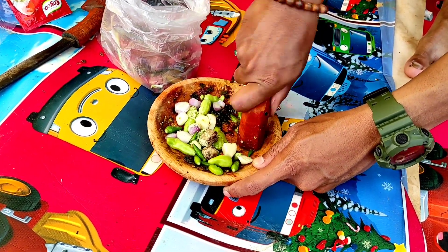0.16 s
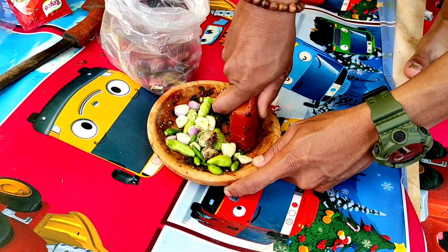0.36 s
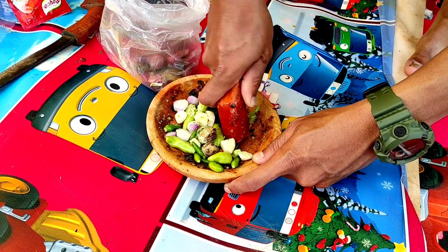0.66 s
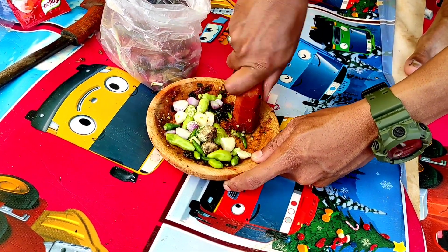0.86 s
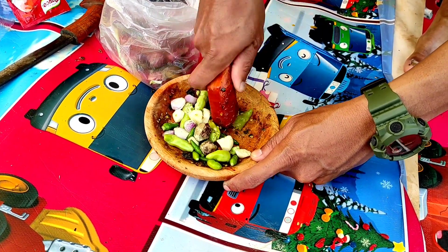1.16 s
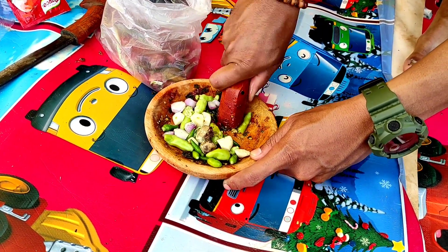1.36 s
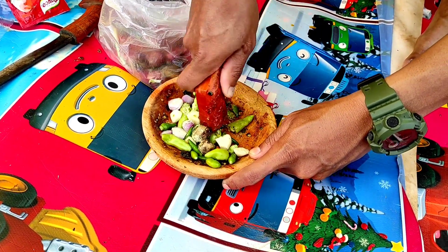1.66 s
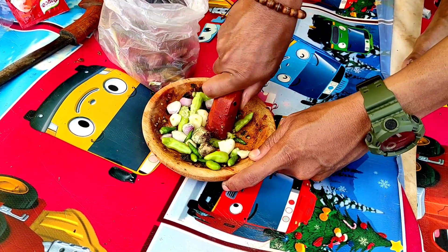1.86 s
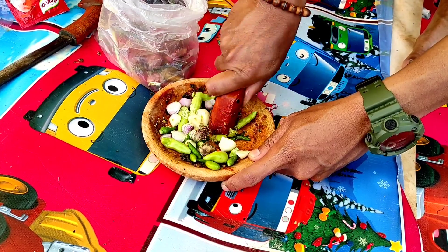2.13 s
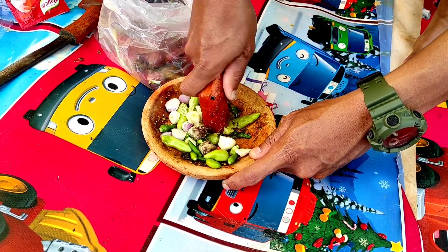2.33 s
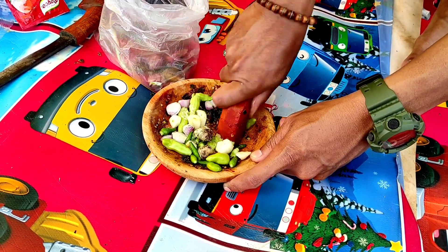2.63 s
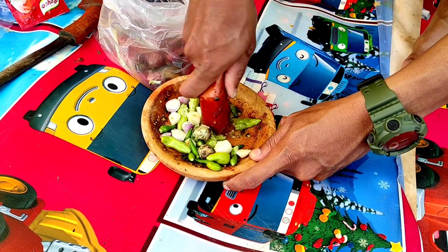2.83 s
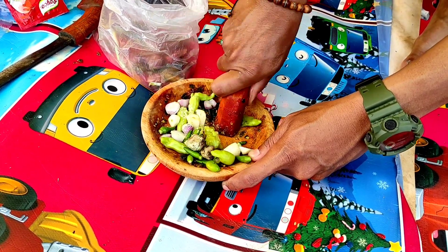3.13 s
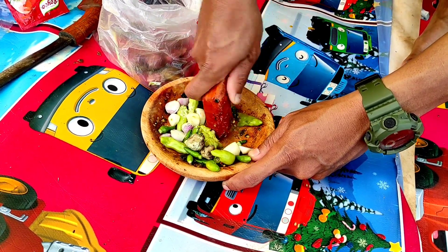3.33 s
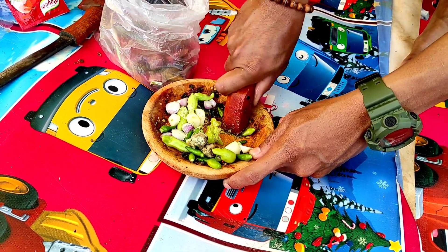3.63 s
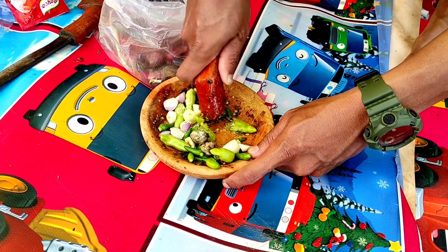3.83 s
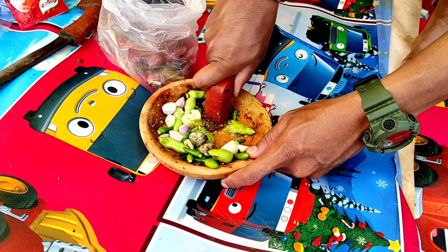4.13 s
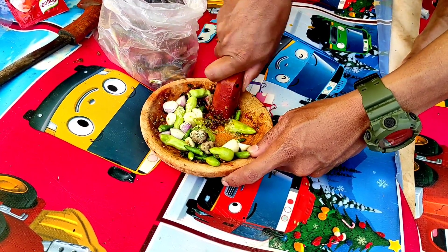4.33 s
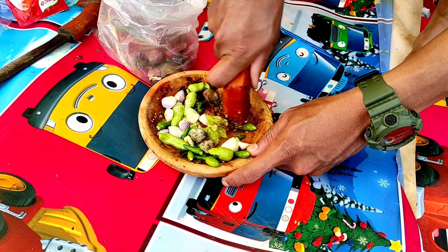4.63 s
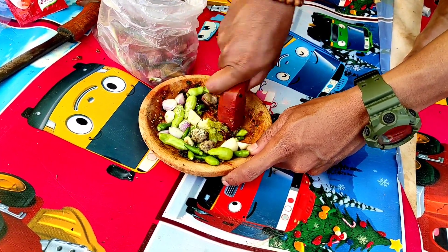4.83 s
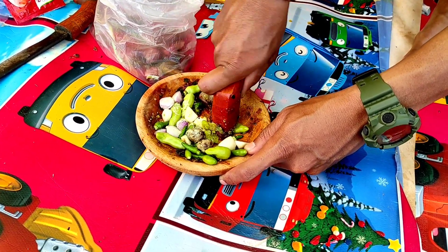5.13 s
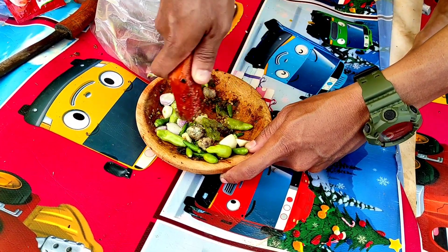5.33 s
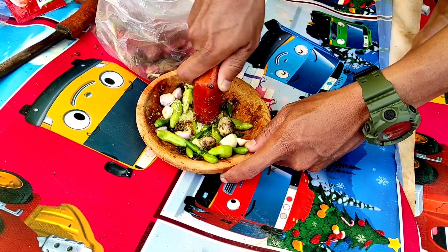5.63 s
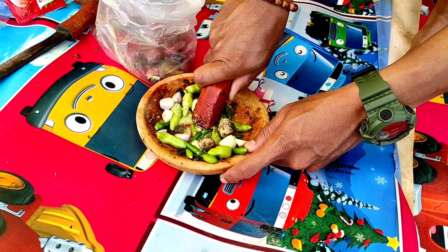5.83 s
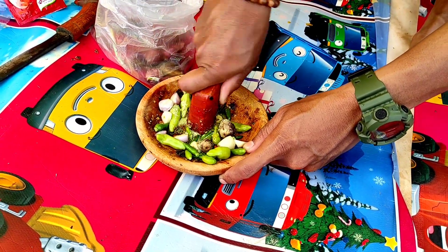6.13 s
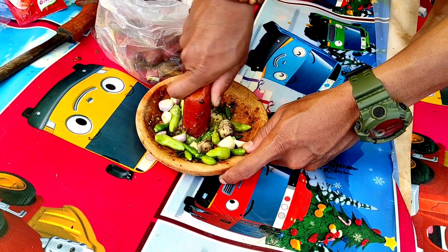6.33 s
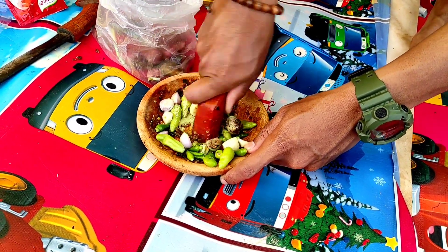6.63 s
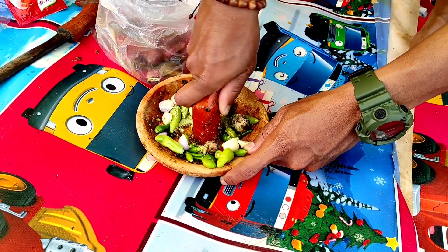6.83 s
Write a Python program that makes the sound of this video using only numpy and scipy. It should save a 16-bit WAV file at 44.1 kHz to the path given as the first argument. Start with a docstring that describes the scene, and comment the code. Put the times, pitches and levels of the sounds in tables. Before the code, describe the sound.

Close up outdoors, a wooden pestle presses and drags through shallots, garlic and chilies in a small hand-held wooden mortar. Uneven wet crackling strokes come several times a second, with sharp little skin snaps. At about four seconds heavier blows begin, loud hollow knocks with cracking pulp and short wooden ringing, until just before six seconds; then brisk wet crunching returns. Faint insects and low hum lie behind. The close stereo microphone sounds bright and dry.

```python
"""Outdoors, insects shrill faintly over rumble, hiss and a far low hum: all are steady bands of noise.
From the start a wooden pestle works shallots, garlic and chilies in a hand-held wooden mortar on a mat:
wet strokes are clouds of tiny clicks, skins snap as short bursts, and soft knocks and a light tap join in.
From about 4 s harder blows knock through to the bowl, adding thuds, cracks and decaying ringing modes.
Two small microphone ports, resonant around 7 to 9 kHz, brighten everything."""
import sys
import numpy as np
from scipy import signal
from scipy.fft import rfft, irfft
from scipy.io import wavfile

SR = 44100
rng = np.random.default_rng(int(sys.argv[2]) if len(sys.argv) > 2 else 0)


def wav_record(signal):
    """Record a signal, one row per channel, as 16-bit PCM in the file named by sys.argv[1]."""
    frames = np.transpose(np.atleast_2d(signal))
    bounded = np.clip(frames, -1, 1)
    # unit amplitude maps onto the largest positive 16-bit level
    quanta = np.round(bounded * 32767).astype(np.int16)
    wavfile.write(sys.argv[1], SR, quanta)


N = 307818

# In all tables: levels are relative and trimmed by their layer, pan_db is left minus right,
# and t60_s is the time to fall by 60 dB.
# Spectra of the air on each side: pitch_hz, density_db (per Hz)
AIR_LEFT_SPECTRUM = [(20, 21.5), (60, 13), (110, 21), (165, 25), (230, 19), (400, 13.5), (1000, 5.5),
                     (2000, -2.5), (4000, -3.5), (5700, 6), (6500, 3.5), (8500, 3), (10500, -10),
                     (15000, 2.5)]
AIR_RIGHT_SPECTRUM = [(20, 10), (60, 17), (110, 13.5), (165, 21.5), (230, 14), (400, 10), (1000, 0.5),
                      (2000, -0.5), (4000, -1.5), (5700, 5.5), (6500, -2), (8500, 3), (10500, -4),
                      (15000, -1.5)]
# The pestle leans into the pulp and eases off: start_s, press_s, ease_s, crackle_db, rub_db
STROKES = [(0.01, 0.036, 0.035, -63, -63.5), (0.26, 0.092, 0.048, -46.5, -57),
           (0.471, 0.13, 0.034, -53, -59), (0.699, 0.033, 0.047, -55.5, -63.5),
           (0.897, 0.07, 0.093, -46, -54.5), (1.061, 0.039, 0.036, -45.5, -54.5),
           (1.162, 0.045, 0.025, -58.5, -63), (1.347, 0.015, 0.12, -45.5, -55),
           (1.571, 0.012, 0.12, -52, -61.5), (1.79, 0.047, 0.064, -42.5, -51),
           (1.912, 0.068, 0.088, -47.5, -57), (2.144, 0.012, 0.075, -41, -55),
           (2.253, 0.032, 0.048, -46, -58.5), (2.36, 0.075, 0.042, -58, -63.5),
           (2.581, 0.068, 0.046, -48, -56), (2.678, 0.029, 0.052, -41, -53), (2.82, 0.04, 0.03, -57, -60.5),
           (3.059, 0.021, 0.023, -46, -58.5), (3.115, 0.011, 0.14, -46, -55.5),
           (3.288, 0.022, 0.054, -52, -58), (3.61, 0.083, 0.13, -50, -57.5),
           (4.036, 0.1, 0.12, -41.5, -53.5), (4.369, 0.028, 0.093, -46, -56.5),
           (4.462, 0.029, 0.21, -56.5, -63), (4.755, 0.013, 0.12, -49, -55.5),
           (4.901, 0.032, 0.022, -42, -62), (5.045, 0.069, 0.012, -46.5, -68),
           (5.50, 0.048, 0.06, -46.5, -60.5), (5.68, 0.29, 0.096, -54, -62),
           (5.997, 0.035, 0.054, -37.5, -51), (6.119, 0.094, 0.076, -48, -65),
           (6.259, 0.012, .03, -42.5, -54.5), (6.304, .02, 0.065, -44, -54.5),
           (6.417, 0.61, 0.068, -48.5, -65.5), (6.635, .015, 0.043, -51, -61.5),
           (6.707, 0.039, 0.027, -38, -49.5), (6.815, 0.013, 0.046, -45, -52.5),
           (6.91, 0.088, 0.035, -49, -55)]
# Spectra of bursting wet cells and of rubbing heard through the wood: pitch_hz, density_db (per Hz)
CRACKLE_SPECTRUM = [(1500, -16.5), (3000, -4.5), (4500, -5.5), (6000, -0.5), (7500, 1), (9000, -5.5),
                    (12000, -2.5), (15000, -13.5)]
RUBBING_SPECTRUM = [(100, -12.5), (200, -2.5), (400, -5.5), (635, 6.5), (800, 4), (1050, 6.5), (1400, 0.5),
                    (1750, -4.5), (2150, -0.5), (2400, 1), (2700, -3.5), (3320, 1), (4200, -2), (5500, -14),
                    (12000, -53)]
# Single skins and seeds snapping: start_s, level_db, wood_share_db, pan_db
SNAPS = [(0.222, -10, -24.5, 1), (0.226, -4.5, -27, 5), (0.2286, -9.5, -32, -1), (0.2393, -13.5, -59, -1),
         (0.588, -18, -51, -5), (1.0983, -20, -27, 6), (0.3197, -33, -25, 2), (0.3456, -25, -25, -10),
         (0.562, -31, -32, -12), (0.9491, -28, -15, 13), (1.033, -26.5, -22, 9), (1.352, -30.5, -6.5, -10),
         (1.6237, -37, -18, 2), (1.802, -25, -36, -4), (1.844, -33, -6, 0), (2.0103, -30, -38, -11),
         (2.2787, -28, -37, -10), (2.6906, -24, -22, -5), (3.0898, -30, -20, 5), (3.3005, -38, -25, -6),
         (1.81, -21.5, -37, -5), (1.8237, -35, -14, 3), (1.8377, -21, -18, -3), (1.956, -28, -33, 4),
         (2.0362, -21, -19.5, -3), (2.156, -30.5, -17, -6), (2.2162, -26, -43, 6), (2.2863, -26.5, -39, -9),
         (2.7028, -21, -25, -9), (2.7254, -29, -27, -11), (3.0784, -30.5, -9, 5), (3.316, -29.5, -23, -10),
         (3.7279, -19.5, -27, 4), (3.905, -27, -21, 3), (4.772, -27, -12.5, 8), (4.804, -23.5, -10.5, -3.5),
         (4.846, -29, -12, -2), (4.94, -24, -16.5, -9), (5.0165, -18, -13, 2.5), (5.161, -28.5, -12, -7),
         (5.979, -25.5, -33, -5), (6.0324, -16, -46, -1.5), (6.269, -29, -11, -5), (6.2933, -22, -39, -5),
         (6.6958, -21.5, -13, 1), (6.7528, -24.5, -22, 13), (6.792, -28, -22, 2), (6.7212, -19.5, -25, -9),
         (6.7631, -20.5, -10, 6), (6.835, -15.5, -51, -1.5)]
# Pestle meeting the bowl: start_s, level_db, thud_hz, contact_s, bareness (0 on pulp to 1 on wood),
# ring_cutoff_hz, mat_push_db
BLOWS = [(0.2229, -41.5, 420, 0.0012, .2, 700, 12), (1.351, -43.5, 480, .006, .1, 600, 1),
         (2.454, -46, 540, 0.017, .3, 700, -15), (2.897, -44.5, 262, 0.01, .2, 496, 5),
         (2.965, -42, 420, 0.0056, .15, 500, 4), (3.9924, -12, 544, 0.012, .03, 890, 5.5),
         (4.0125, -18.5, 539, 0.01, .2, 500, 9.5), (4.211, -8.5, 539, 0.012, .42, 3600, 4),
         (4.354, -19, 531, 0.011, .15, 1270, 8.5), (4.623, -50.5, 548, 0.027, .6, 1300, -15),
         (5.016, -41.5, 457, 0.0052, .5, 800, 16.5), (5.09, -10, 560.4, 0.013, 1.0, 1300, 1),
         (5.3021, -10.5, 550, 0.0087, .88, 1600, 1.5), (5.473, -9.5, 533, 0.011, .85, 2000, 0),
         (5.634, -9.5, 534, 0.012, .9, 2400, -2.5), (6.925, -54.5, 296, 0.025, .1, 500, 16)]
# Modes of pestle and bowl while pressed together: pitch_hz, level_db, t60_s
CLACK_MODES = [(412, -9, 0.074), (1093, -22, 0.061), (1426, -10.5, 0.086), (1580, -17.5, 0.024),
               (1810, -21, 0.02), (2487, -16.5, 0.027), (2740, -8.5, 0.053), (2890, -27.5, 0.04),
               (3930, -23.5, 0.066)]
# Modes of the freely ringing bowl: pitch_hz, level_db, t60_s, pan_db
BOWL_MODES = [(565, -17, 0.19, -0.5), (1477, -18.5, 0.15, 9), (1808, -18, 0.049, 3), (2080, -23, 0.066, -4),
              (2400, -34.5, 0.06, 2.5), (2640, -26, 0.054, 3), (2085, -23, 0.11, 1.5),
              (2959, -20, 0.11, -5), (3900, -31.5, 0.1, 1), (4500, -33.5, 0.077, -12),
              (4900, -38.5, 0.06, 8.5)]
# Spectrum of the many heavily damped wood modes, heard as one dense rap: pitch_hz, density_db (per Hz)
RAP_SPECTRUM = [(50, -39.5), (150, -12.5), (250, -5.5), (450, 8.5), (700, -9), (1050, -2), (1280, -2),
                (1550, 6.5), (1900, -8), (2250, -10.5), (2620, 1), (3000, -7), (3500, -25.5), (4080, -10),
                (4600, -18.5), (9000, -30.5)]
# Spectrum of pulp cracking under a blow: pitch_hz, density_db (per Hz)
CRACK_SPECTRUM = [(300, 4.5), (1000, 5), (2500, -5), (4000, -4.5), (6000, -4.5), (8000, -6.5),
                  (10000, -7.5), (15000, -23)]
# Faint echoes of the blows from things nearby: delay_s, level_db
ECHOES = [(0.046, -38.5), (.076, -39), (.108, -44.5)]
# Modes rung by a light tap on the bare wall: pitch_hz, level_db, t60_s
TAP_MODES = [(1460, -4, 0.16), (1600, 1.5, 0.037), (1790, -4, 0.062), (2110, -11, 0.15)]
# Response of each microphone port: pitch_hz, gain_db
PORT_LEFT = [(4400, 2), (5400, -4), (6800, -6.5), (7600, 6.5), (8600, 18), (9150, 18.5), (9700, -1),
             (11000, -4.5), (12000, -15), (15000, -9)]
PORT_RIGHT = [(4400, 0.5), (5600, 3), (6500, 6.5), (7300, 15.5), (8000, 15.5), (8800, 9.5), (9500, 2),
              (11000, -30), (12000, -8.5), (15000, -9)]

# Pulp under the pestle muffles the wood; trims as (on_pulp_db, on_bare_wood_db)
CLACK_DB, RING_DB, RIM_DB = (-38.5, -2), (-7.5, 0), (-32.5, -21)
CRACK_DB, RAP_DB = (-24, -19.5), (-21, -4)
CRACK_FOLLOWS, RAP_FOLLOWS = 0.63, 0.78  # dB of crack or rap per dB of blow


def from_db(db):
    """Decibels to an amplitude factor."""
    return 10 ** (np.asarray(db) / 20)


def rms_one(x):
    """Scale to an RMS of 1."""
    return x / np.sqrt(np.mean(x ** 2) + 1e-20)


def panned(db):
    """Left and right gains whose difference is db."""
    return from_db(np.array([[db], [-db]]) / 2)


def add(out, s, sound):
    """Mix a sound in at s seconds."""
    start = int(s * SR)
    out[:, start:start + sound.shape[1]] += sound[:, :max(N - start, 0)]


def butter(x, hz, kind, order=2):
    """Butterworth filter."""
    return signal.sosfilt(signal.butter(order, hz, kind, fs=SR, output="sos"), x)


def band_edges(hz, width_hz):
    """Lower and upper edge of a band."""
    return hz + width_hz * np.array([-0.5, 0.5])


def colour(x, points, size=4096):
    """Causal (minimum-phase) filter that follows a spectrum."""
    hz, db = np.transpose(points)
    grid = np.linspace(1, SR / 2, size // 2 + 1)
    gain = from_db(np.interp(np.log(grid), np.log(hz), db))
    cepstrum = irfft(np.log(gain))
    # folding the cepstrum forward in time makes the filter causal
    cepstrum[1:size // 2] *= 2
    cepstrum[size // 2 + 1:] = 0
    impulse = irfft(np.exp(rfft(cepstrum)))
    return signal.oaconvolve(x, impulse[None])[:, :x.shape[1]]


def stereo_noise(size, alike):
    """White noise whose sides share a part: alike is 0 for separate, 1 for identical."""
    shared, left, right = rng.standard_normal((3, size))
    return np.sqrt(alike) * shared + np.sqrt(1 - alike) * np.array([left, right])


def swell(t, t60, rise_s):
    """An envelope that builds up and then dies away."""
    return (1 - np.exp(-t / rise_s)) * 1000 ** (-t / t60)


def tone(t, hz, lag_rad=1.465):
    """Opposite walls of the bowl move against each other, so the left port hears part of a cycle late."""
    return np.sin(2 * np.pi * hz * t - np.array([[lag_rad], [0]]))


def mode(t, hz, t60, rise_s):
    """A resonance that swells during the contact and then rings out."""
    return swell(t, t60, rise_s) * tone(t, hz)


def hollow(x, spread_s=0.004, echo_db=1.5, count=10):
    """Bowl wall, pestle and fingers return a few very short echoes, drawn anew for each sound."""
    paths = np.zeros((2, int(spread_s * SR) + 2))
    paths[:, 0] = 1  # direct sound
    for side in paths:
        lags = 1 + (rng.random(count) * spread_s * SR).astype(int)
        side[lags] = from_db(echo_db) * rng.standard_normal(count) / np.sqrt(count)
    heard = signal.oaconvolve(x, paths, axes=1)[:, :x.shape[1]]
    return heard / np.sqrt(1 + from_db(echo_db) ** 2)


def outdoors(air_db=-64.0):
    """Far rumble, alike on both sides, under a thin hiss and a steady band of insect song."""
    rumble = butter(stereo_noise(N, alike=1.0), hz=700, kind="low", order=1)
    hiss = butter(stereo_noise(N, alike=0.034), hz=700, kind="high", order=1)
    air = rumble + hiss
    air = np.vstack([colour(air[:1], AIR_LEFT_SPECTRUM), colour(air[1:], AIR_RIGHT_SPECTRUM)])
    song = butter(stereo_noise(N, alike=0.1), band_edges(hz=8700, width_hz=600), "band")
    return from_db(air_db) * air + from_db([[-73.5], [-80.5]]) * rms_one(song)  # insects louder at left


def far_hum(hum_db=-71.0):
    """A faint, unsteady low hum from far away: a narrow band of noise."""
    hum = butter(stereo_noise(N, alike=0.91), band_edges(hz=170, width_hz=30), "band")
    return from_db(hum_db) * panned(db=2.0) * rms_one(hum)


def pressure(t, press_s, ease_s, bite_s=0.0024, lift_s=0.051):
    """A stroke bites, builds to its peak, eases and lifts off; returns a share of peak pressure."""
    return np.interp(t, np.cumsum([0, bite_s, press_s, ease_s, lift_s]), [0, 0.66, 1, 0.32, 0])


def drift(rate):
    """Smooth random wander with a spread near 1, taking a new value rate times a second."""
    knots = rng.standard_normal(N // 20)
    return np.interp(np.arange(N) / SR * rate, np.arange(len(knots)), knots)


def grains(size, per_s, spread_db):
    """Bursting cells: random clicks of uneven size, heard differently on each side."""
    born = rng.random(size) < per_s / SR
    sizes = from_db(spread_db * np.minimum(rng.exponential(1, size), 4))
    return rms_one(born * sizes * stereo_noise(size, alike=0.13))


def grinding(crackle_db=-8.0, clump_db=1.5, catch_db=2.0):
    """The pestle drags over wet pulp; the same grains crackle in air and sound through the wood."""
    out = np.zeros((2, N))
    unevenness_db = clump_db * drift(rate=160) + catch_db * drift(rate=41)
    cells = rms_one(grains(N, per_s=1500, spread_db=0.5) * from_db(unevenness_db))
    bright = rms_one(colour(cells, CRACKLE_SPECTRUM))
    woody = rms_one(colour(cells, RUBBING_SPECTRUM))
    for s, press_s, ease_s, wet_db, wood_db in STROKES:
        start = int(s * SR)
        span = np.arange(start, min(start + SR // 2, N))  # a stroke sounds for half a second at most
        force = pressure(span / SR - s, press_s, ease_s)
        add(out, s, from_db(crackle_db + wet_db) * hollow(bright[:, span] * force))
        add(out, s, from_db(wood_db) * hollow(woody[:, span] * force))
    return out


def slips(count=7, low_hz=600, high_hz=4200, t60=0.035):
    """The pestle sticks and slips: short, coarse scrapes, each with its own pitch, follow the pressure."""
    out, t = np.zeros((2, N)), np.arange(SR // 16) / SR
    for s, press_s, ease_s, _, wood_db in STROKES:
        for when, pitch, size in rng.random((count, 3)):
            hz = low_hz * (high_hz / low_hz) ** pitch
            at = when * (press_s + ease_s)
            coarse = grains(len(t), per_s=1200, spread_db=-1.5)
            scrape = rms_one(butter(coarse, band_edges(hz, width_hz=0.45 * hz), "band", order=1))
            level_db = wood_db - 13 + 9 * size  # 13 to 4 dB under the stroke's rubbing
            strength = from_db(level_db) * pressure(at, press_s, ease_s)
            add(out, s + at, strength * scrape * swell(t, t60, rise_s=0.0007))
    return out


def small_snaps():
    """Each stroke also breaks a small skin near its peak, as strong as it is wet; rows as in SNAPS."""
    rows = []
    for s, press_s, ease_s, wet_db, _ in STROKES:
        when = rng.uniform(-0.55, 1)  # negative: before the peak
        reach_s = (press_s if when < 0 else ease_s) / 2
        rows.append((s + press_s + when * reach_s, wet_db + 6, -23, -20.5))
    return rows


def snaps(snap_db=-5.0, wood_db=7.5, click_db=3.0, tear_db=-16.5, tear_per_db=0.2):
    """A skin breaks with one sharp click amid a quick burst, then tears on more softly."""
    bright, woody, t = np.zeros((2, N)), np.zeros((2, N)), np.arange(SR // 8) / SR
    click = from_db(click_db) * (np.arange(len(t)) == int(0.0016 * SR))  # one sample, 1.6 ms in
    for s, db, wood_share_db, pan_db in list(SNAPS) + small_snaps():
        tear = from_db(tear_db + tear_per_db * db) * swell(t, t60=0.1, rise_s=0.0019)  # more if harder
        fall = swell(t, t60=0.0067, rise_s=0.00051) + tear
        cells = hollow(fall * grains(len(t), per_s=24000, spread_db=0.0))
        burst = from_db(db) * (click + cells) * panned(pan_db)
        add(bright, s, from_db(snap_db) * burst)
        add(woody, s, from_db(wood_db + wood_share_db) * burst)
    return colour(bright, CRACKLE_SPECTRUM) + colour(woody, RUBBING_SPECTRUM)


def thud(t, hz, contact_s, rise_s, release_s):
    """The bowl rocks at one hollow pitch until the contact ends, then is released."""
    pressed = np.clip(t / rise_s, 0, 1) * np.clip((contact_s - t) / release_s + 1, 0, 1)
    return pressed * tone(t, hz)


def overtone(t, hz, bare, db=-14.5):
    """The one-sided contact of hard wood briefly adds the octave of the thud."""
    return from_db(db) * np.sqrt(bare) * mode(t, 2 * hz, t60=0.053, rise_s=0.002)


def clack(t, scatter_db=1.2, detune=0.0047):
    """Wood on wood: short, strongly damped modes that shift a little with the spot struck."""
    out = 0
    for k, (hz, db, t60) in enumerate(CLACK_MODES):
        lag_rad = np.interp(hz, [1500, 2500], [1.5, 2.7])  # high modes reach the left later in their cycle
        wave = tone(t, hz * (1 + detune * rng.standard_normal()), lag_rad)
        strength = from_db(db + scatter_db * rng.standard_normal())
        out = out + (-1) ** k * strength * swell(t, t60, rise_s=0.0006) * wave
    return out


def rap(t, t60=0.06):
    """A dense, woody burst of noise as the pestle's rough end meets the bowl."""
    return colour(stereo_noise(len(t), alike=0.21) * swell(t, t60, rise_s=0.0018), RAP_SPECTRUM)


def bowl_ring(t, cut_hz, scatter_db=-5.0, rock_db=-12.5):
    """The released bowl rocks on and rings; a softer blow spares the modes above its cutoff."""
    out = from_db(rock_db) * thud(t, hz=574, contact_s=0.026, rise_s=0.016, release_s=0.014)
    for hz, db, t60, pan_db in BOWL_MODES:
        softening = np.sqrt(1 + (hz / cut_hz) ** 4)
        strength = from_db(db + scatter_db * rng.standard_normal()) / softening
        out = out + strength * panned(pan_db) * mode(t, hz, t60, rise_s=0.007)
    return out


def mat_thump(t, push_db=21.0, bounce_db=-11.5, sway_db=5.5):
    """The blow pushes the bowl into the mat, where it bounces at a low pitch."""
    push = butter(1.0 * (t == 0), hz=420, kind="low", order=5)
    push = from_db(push_db) * butter(push, hz=145, kind="high", order=4)
    bounce = from_db(bounce_db) * mode(t, hz=177.0, t60=0.067, rise_s=0.035)
    sway = from_db(sway_db) * mode(t, hz=384.0, t60=0.022, rise_s=0.014)
    return butter(push - bounce + sway, hz=103.3, kind="high") * panned(db=3.5)


def pulp_crack(t, t60=0.098):
    """Pulp gives way under a blow in a wet burst of noise."""
    burst = stereo_noise(len(t), alike=0.33) * swell(t, t60, rise_s=0.0032)
    return colour(hollow(burst), CRACK_SPECTRUM)


def knocks(thud_pan_db=-1.5, ground_db=-28.5, crack_lead_s=0.0024):
    """Each blow thuds, clacks, raps, rings, thumps and cracks; barer wood clacks and rings more."""
    out, t = np.zeros((2, N)), np.arange(SR // 2) / SR
    mat = mat_thump(t)
    ground = from_db(ground_db) * mode(t, hz=80, t60=0.14, rise_s=0.006)
    rim = mode(t, hz=862, t60=0.34, rise_s=0.006) * panned(db=8.0)  # flexes like a bell, lasts longest
    for s, db, hz, contact_s, bare, cut_hz, mat_db in BLOWS:
        clack_db, ring_db, rim_db, crack_db, rap_db = (
            pulp + bare * (wood - pulp) for pulp, wood in (CLACK_DB, RING_DB, RIM_DB, CRACK_DB, RAP_DB))
        pressed = thud(t, hz, contact_s, rise_s=0.0064, release_s=0.007) * panned(thud_pan_db)
        pressed = pressed + from_db(clack_db) * clack(t) + overtone(t, hz, bare)
        pressed = butter(pressed, hz=128.4, kind="high")  # the pressed sound keeps little deep bass
        free = from_db(ring_db) * bowl_ring(t, cut_hz) + from_db(rim_db) * rim
        # a cushioned blow pushes long enough to move the ground
        low = from_db(mat_db) * mat + (1 - bare) * ground
        add(out, s, from_db(db) * (pressed + free + low))
        add(out, s, from_db(rap_db + RAP_FOLLOWS * db) * rap(t))
        # the pulp gives way just before the wood is met
        add(out, s - crack_lead_s, from_db(crack_db + CRACK_FOLLOWS * db) * pulp_crack(t))
    return out


def echoed(x, dull_hz=3000):
    """The sound with its few faint, dull outdoor echoes."""
    out, dull = x.copy(), butter(x, dull_hz, "low", order=1)
    for delay_s, db in ECHOES:
        add(out, delay_s, from_db(db) * dull)
    return out


def tap(s=1.341, db=-42.0):
    """The pestle touches the bare wall with a small, bright tock before it slides into the pulp."""
    out, t = np.zeros((2, N)), np.arange(SR // 4) / SR
    for hz, level_db, t60 in TAP_MODES:
        ring = swell(t, t60, rise_s=0.002) * tone(t, hz, lag_rad=1.0)
        add(out, s, from_db(db + level_db) * ring)
    return out


def scene():
    """All layers together."""
    return outdoors() + far_hum() + grinding() + slips() + snaps() + echoed(knocks()) + tap()


def record(dry, cutoff_hz=15800):
    """Each port adds its own resonance; a steep filter cuts the top."""
    heard = np.vstack([colour(dry[:1], PORT_LEFT), colour(dry[1:], PORT_RIGHT)])
    return signal.sosfilt(signal.ellip(10, 0.1, 80, cutoff_hz, fs=SR, output="sos"), heard)


dry = scene()
out = record(dry)
wav_record(out)
```